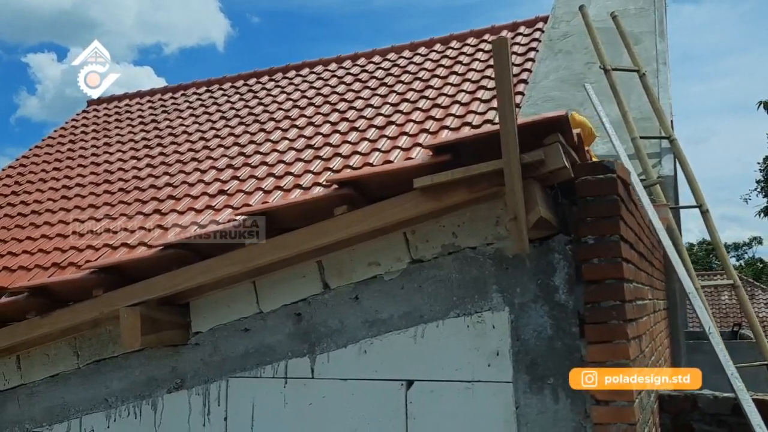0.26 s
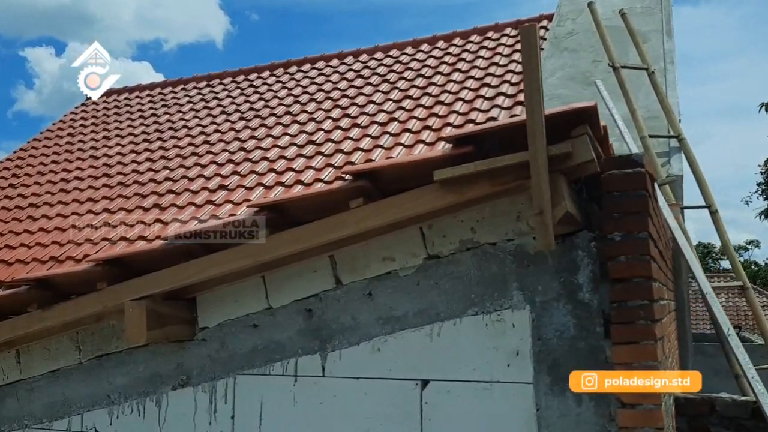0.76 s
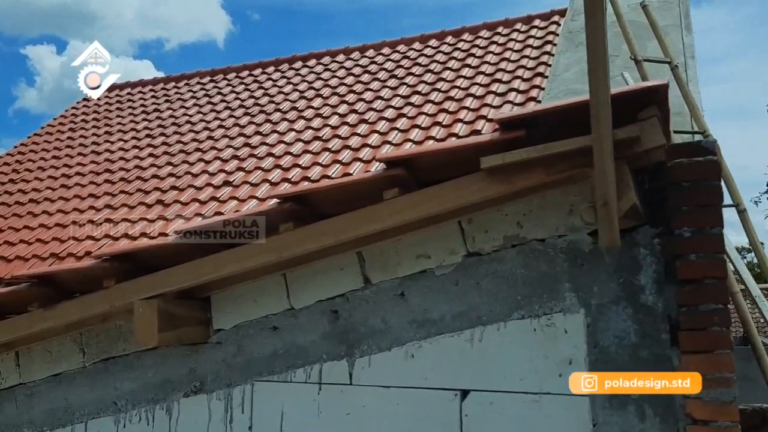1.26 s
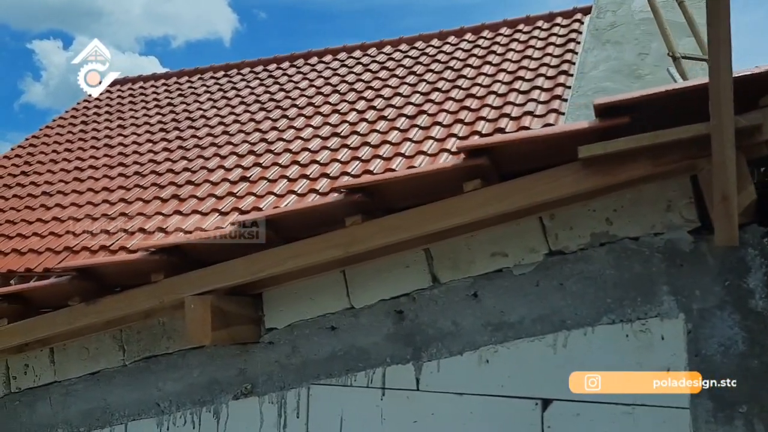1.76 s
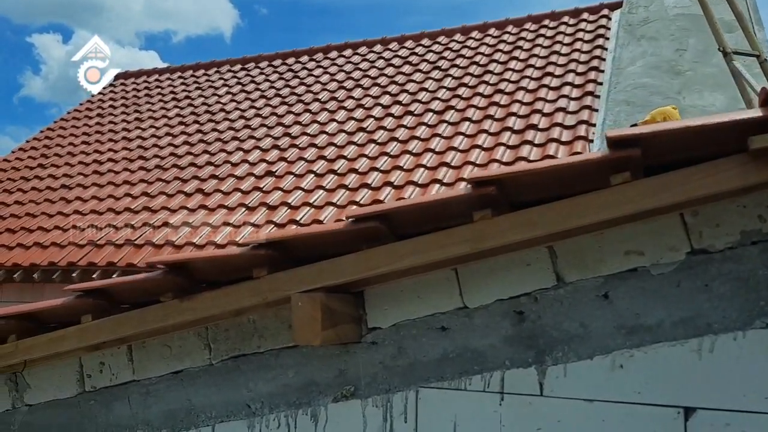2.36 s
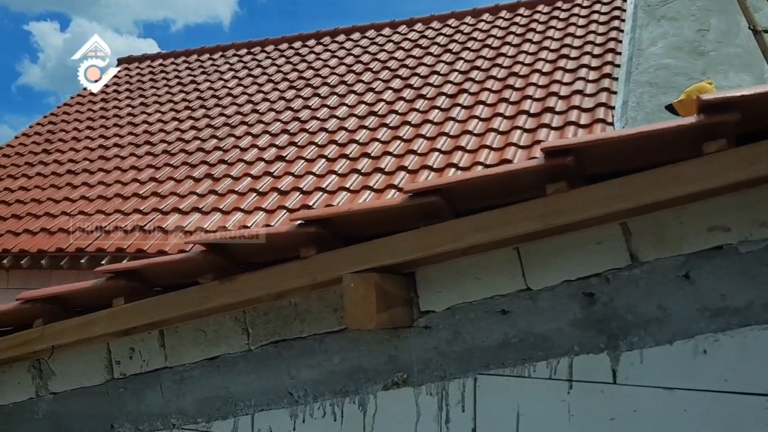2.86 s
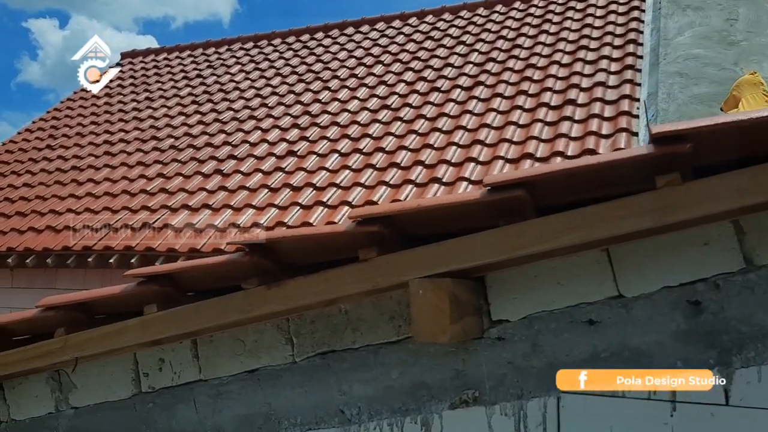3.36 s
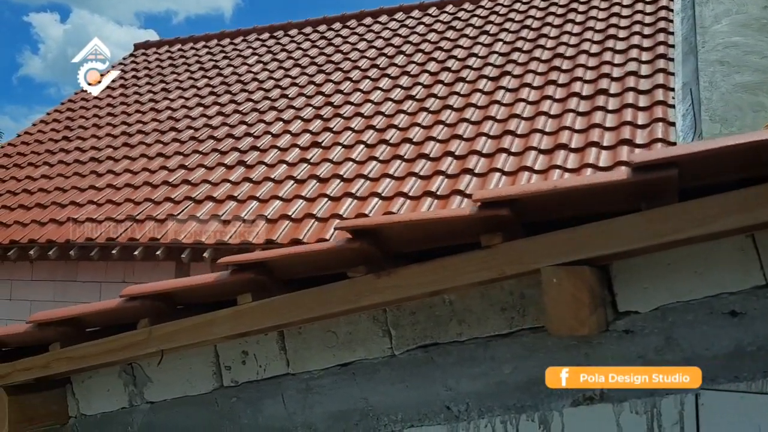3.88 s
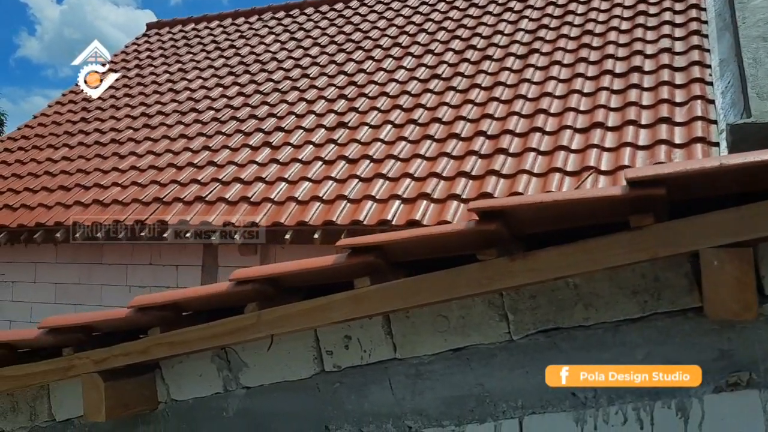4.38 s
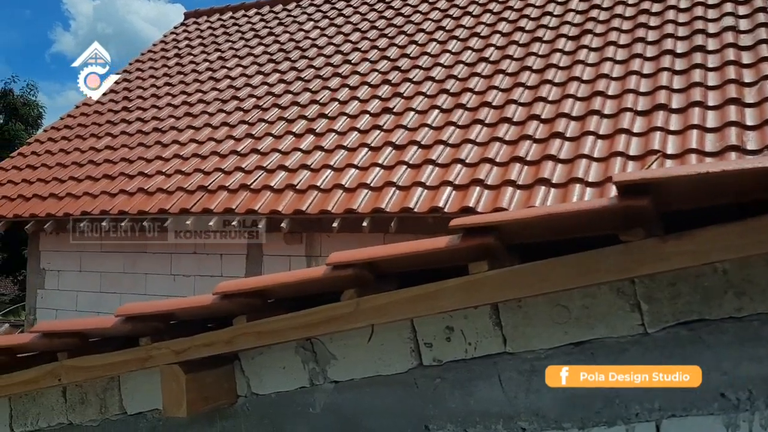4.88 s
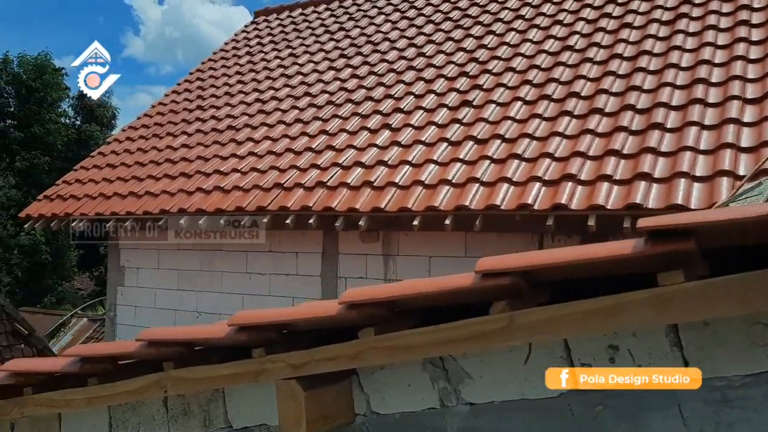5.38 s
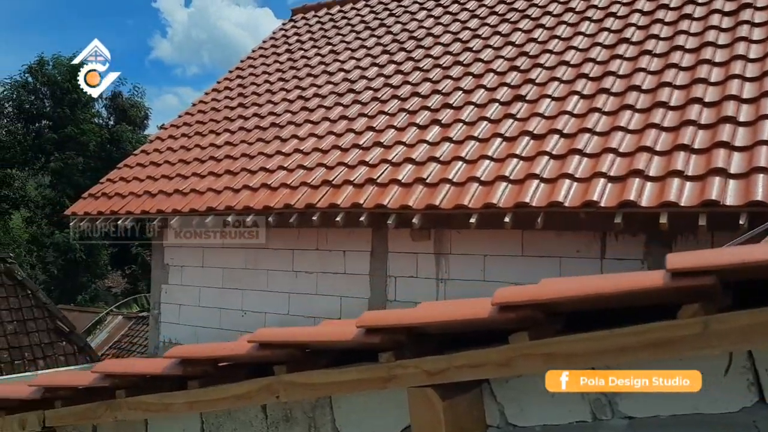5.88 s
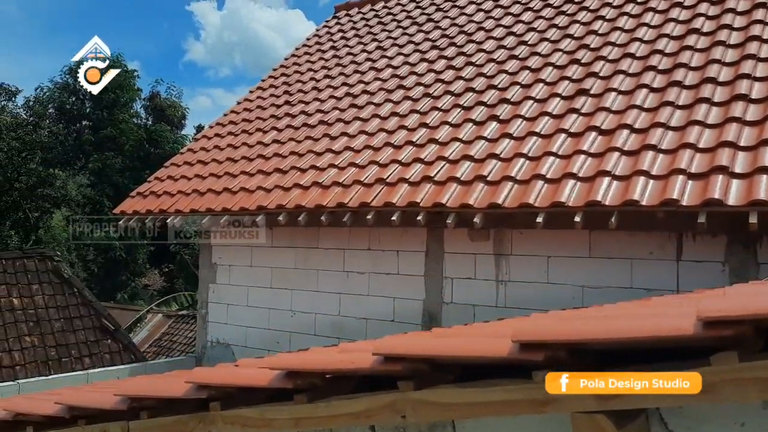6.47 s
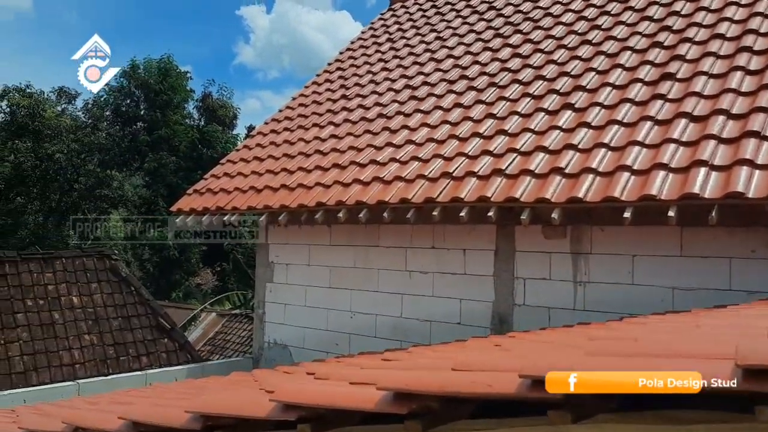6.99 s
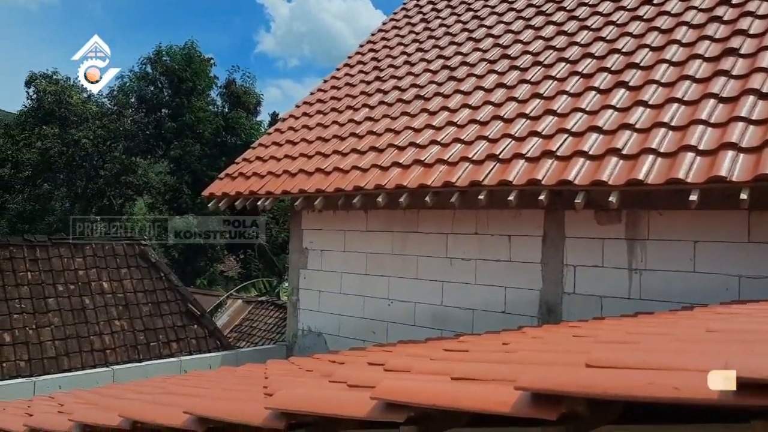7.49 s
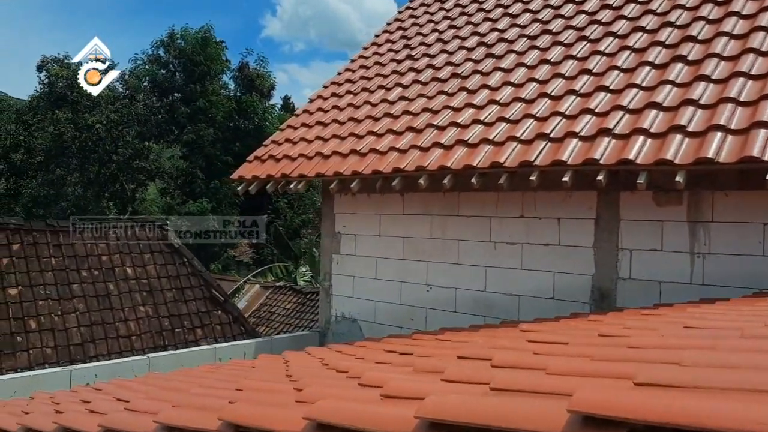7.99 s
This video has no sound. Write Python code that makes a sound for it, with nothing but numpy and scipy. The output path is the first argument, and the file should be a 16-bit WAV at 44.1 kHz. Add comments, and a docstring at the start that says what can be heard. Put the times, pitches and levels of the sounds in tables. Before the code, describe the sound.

A steel hammer drives a chisel into stone in even, ringing blows that boom through bare rooms, over a quiet outdoor hush.

```python
"""Over a quiet outdoor hush, dull knocks sound from deep inside an unfinished brick house. A steel hammer
taps a chisel once, then drives it in eleven even blows: each a sharp crack, a brief steel ring, then the
boom of the bare rooms. From 1 s a far whine climbs; it and the knocks are gone by about 3 s. Grit ticks
and something scuffs between blows, and a thin, very high squeak flickers near 3.7 s and 6 s. One last far
knock closes the scene. Heard through two microphone ports, the left one nearer the hammer."""
import sys
import numpy as np
from scipy import signal
from scipy.fft import rfft, irfft, next_fast_len
from scipy.io import wavfile
from scipy.ndimage import map_coordinates

SR = 44100
rng = np.random.default_rng(int(sys.argv[2]) if len(sys.argv) > 2 else 0)


def store_pcm(level_fs):
    """Save levels as 16-bit WAV."""
    pcm = np.round(np.clip(level_fs, -1, 1) * 32767).astype(np.int16)
    wavfile.write(sys.argv[1], SR, np.atleast_2d(pcm).T)


N = 363384

# One row a blow: t/s, wash EQ at 12 kHz/dB, wash EQ at 1.5 kHz/dB, ring length/factor,
# left minus right/dB, standing waves/dB, 3 x wall knock/dB, clack Q, boom/dB, wash/dB, clack/dB,
# clack f/Hz, spit/dB, spit f/Hz, boom EQ from 900 Hz up/dB, 6 x ring group/dB
BLOWS = [(0.242, -3, -2, 0.73, 0, -45, -58, -48, -52, 6.6, -49, -57, -48, 2220, -46, 7500, -25.5, -66, -49, -58.5, -67, -65, -68),
         (0.77, 3, -4.5, 0.97, 0.94, -48.5, -27.5, -38, -49, 6, -32, -40.5, -21, 2440, -20.5, 8330, -4, -32, -36, -36, -28.5, -40, -58),
         (1.462, 2, 1, .9, 1, -43.5, -31, -44, -61, 8.8, -35, -36.5, -20.5, 2350, -27, 11000, -1, -39, -50, -36, -46, -43.5, -50),
         (2.117, -0.5, 0.5, 0.75, 0.02, -43.5, -29, -40, -56, 2.9, -28.5, -35, -14.5, 2700, -26.5, 11000, 0, -46, -39.5, -34, -45, -40, -44),
         (2.783, -2.5, 1, 0.88, 0.7, -38.5, -20, -27, -37, 2.8, -30, -35.5, -19, 2950, -15, 14200, 3.5, -52, -59, -41, -68, -49, -56),
         (3.42, 2, 4.5, 0.58, -1, -38, -27, -31.5, -45.5, 6, -34, -33.5, -18.5, 2200, -22, 11530, -31.5, -37.5, -70, -29.5, -50, -34, -49),
         (4.065, -2, 0, 0.52, 0.064, -34.5, -23, -23, -24, 7.6, -31, -34.5, -19, 1740, -12, 7090, 8.5, -68, -42, -39, -46, -79, -53),
         (4.673, 2.5, -2, 0.67, 0.93, -35.5, -24, -29.5, -31, 6, -30, -40, -28.5, 1845, -12.5, 13700, 7.5, -32, -39, -32.5, -33, -39, -54),
         (5.305, 2, 5, 1.1, -0.12, -34, -31, -31.5, -33, 9.8, -33, -35.5, -29, 2680, -13.5, 8780, -9.5, -49, -36.5, -51, -62, -45, -68),
         (5.914, 1.5, -3, 1.44, -0.66, -34.5, -25.5, -30.5, -50, 6, -31, -39, -28, 2570, -9, 8470, -0.5, -33.5, -46, -42, -32, -42, -62),
         (6.52, 0.5, -0.5, 0.89, -0.24, -34.5, -30, -56, -38, 8.1, -32, -36, -30.5, 2620, -13.5, 8500, -4, -44.5, -35.5, -60, -29.5, -42, -67),
         (7.113, 2.5, -1.5, 1.05, -0.057, -34.5, -23.5, -45, -39, 6, -31, -36, -25, 2730, -14, 8420, -2.5, -43.5, -42, -46.5, -40, -45, -61.5)]
# The hammer touches the chisel again, lightly: t/s, level/dB, f/Hz
REBOUNDS = [(.808, -40, 6350), (1.5, -26.5, 6540), (2.154, -35.5, 6400), (2.819, -37, 6630),
            (3.452, -47, 6400), (4.096, -32.5, 6270), (4.707, -43, 7250), (5.336, -38, 4500),
            (7.148, -34, 13600)]
def hammer():
    """Steel drives the chisel into stone: crack and ring up front, body and room tail behind."""
    out, pan_db = np.zeros((2, N)), np.zeros(N)
    for blow in BLOWS:
        s, top_db, mid_db, ring_length, left_db, deep_db = blow[:6]
        knock_db, ring_db = blow[6:9], blow[17:]
        clack_q, boom_db, wash_db, clack_db, clack_hz, spit_db, spit_hz, edge_db = blow[9:17]
        clack = lambda f: abs(resonance(f, clack_hz, clack_q)) ** 2
        spit = lambda f: abs(resonance(f, spit_hz, 38)) ** 2
        add(out, s, crack(clack, clack_db, spit, spit_db))
        ring = steel_ring(ring_db, ring_length)
        add(out, s, spread(ring, 0.408, 0.49))
        add(out, s, amp(-9.5) * ring_reflections(ring))
        add(out, s, standing_waves(deep_db))
        add(out, s, wall_knocks(knock_db) + amp(boom_db - 13) * thump())
        add(out, s, amp(boom_db) * room_boom(edge_db))
        add(out, s, amp(wash_db) * room_wash(mid_db, top_db, clack, spit))
        pan_db[round(s * SR):] = left_db  # held until the next blow
    for s, db, hz in REBOUNDS:
        add(out, s, amp(db) * burst(lambda f: resonance(f, hz, 8.3) ** 2, t60=.016))
    return out * amp(pan_db * [[.5], [-.5]])


# Clack of the stone under the chisel: f/Hz, level/dB
CLACK_EQ = [(200, -24), (400, -1), (900, -3.5), (1500, -12), (4000, -15), (7000, -16), (10000, -26)]
# Bright spit of steel on steel: f/Hz, level/dB
SPIT_EQ = [(2000, -26), (5000, -33), (7500, 0), (11000, -9), (14000, -6), (16500, -13.5)]
def crack(clack, clack_db, spit, spit_db):
    """The attack: stone clacks and steel spits, two noise bursts with a resonant peak each."""
    stone = burst(lambda f: amp(curve(CLACK_EQ, f)) + amp(-6.5) * clack(f), t60=0.034)
    steel = burst(lambda f: amp(curve(SPIT_EQ, f)) + amp(11.5) * spit(f), t60=0.011)
    return amp(clack_db) * stone + amp(spit_db) * steel


# Modes of hammer and chisel: f/Hz, level/dB, base t60/s, ring group
STEEL_MODES = [(4393, 5, .11, 0), (4548, 2, .11, 4), (4470, -6, .06, 0), (4650, -8, .07, 4),
               (5830, 3, .34, 1), (7208, 2, .07, 2), (7252, 1, .18, 2), (8620, -4, .06, 3),
               (8760, -7, .05, 3), (8240, -7, .05, 3), (9150, -7, .05, 3), (10600, 0, .1, 5)]
GROUP_RISE_S, GROUP_LENGTH = (.0002, .0018, .0002, .0002, .00025, .0003), (1.3, 1.1, 1, .73, 1.7, 1.2)
def steel_ring(group_db, length):
    """The steel's modes waver in phase as hand and stone damp the chisel unevenly."""
    t = np.arange(SR * 2 // 5) / SR
    ring = 0
    for hz, db, t60, group in STEEL_MODES:
        level_db = group_db[group] + db + rng.normal(0, 0.89)
        decay = amp(level_db - 60 * t / (t60 * length * GROUP_LENGTH[group]))
        waver = np.cumsum(rng.standard_normal(len(t))) * .0065 + rng.random()
        ring += decay * np.sin(2 * np.pi * (hz * t + waver)) * attack(t, GROUP_RISE_S[group])
    clink = amp(0.5 - 60 * t / 0.022)  # a louder start, until the stone damps it
    return ring * (1 + clink)


def ring_reflections(ring):
    """The walls return a smeared copy of the ring."""
    walls = reverb(lambda f: f > 3000, rise_s=0.0027, stretch=0.85, lead_ms=0, size=SR // 3)
    return signal.fftconvolve(ring[None], walls / np.linalg.norm(walls[0]), axes=1)


# The push and its slapbacks from big walls: t/s, level/dB
SLAPS = [(.001, 2), (0.022, 4.5), (.04, -2.5), (.058, -3), (0.089, -15)]
# Low-mid resonances of the blow's thump and the room: f/Hz, width/Hz, level/dB
THUMP_RESONANCES = [(202, 110, 1), (287, 30, -8.5), (354, 28, -13), (462, 40, -12), (568, 35, -19.5),
                    (695, 27, -12.5), (880, 60, -21)]
def thump():
    """The body of the hit: a push and its wall returns excite low-mid resonances."""
    push = np.zeros((2, SR // 4))
    for delay, db in SLAPS:
        push[0, round(delay * SR)] = -amp(db + rng.normal(0, 0.95))
    body = lambda f: sum((-1) ** k * amp(db) * resonance(f, hz, hz / width) * np.sqrt(hz / width)
                         for k, (hz, width, db) in enumerate(THUMP_RESONANCES))
    return unit_onset(stereo(filtered(push, body), 0.72, [(1, 1)]))


# Boom of the bare rooms: f/Hz, level/dB
BOOM_EQ = [(18, -60), (33, -33), (60, -8.5), (173, -7.5), (204, -6), (232, -8), (302, 2), (386, -7.5),
           (493, -6), (640, -12.5), (742, -8), (1140, -25), (1500, -29.5), (1950, -57.5), (3300, -120)]
def room_boom(edge_db):
    """The rooms answer a blow with a dark tail; edge_db sets its bite in the mids."""
    colour = lambda f: amp(curve(BOOM_EQ, f) + curve([(350, 0.021), (900, edge_db)], f))
    return reverb(colour, rise_s=0.011, stretch=1, lead_ms=0.3, size=2 * SR // 3)


# Bright reverb of the crack: f/Hz, level/dB
WASH_EQ = [(530, -6), (900, -8), (1410, -15.5), (2190, -17.5), (2970, -21), (5130, -24.5), (5650, -19.5),
           (9780, -19.5), (13700, -11), (15900, -17.5), (16500, -50)]
# Treble tilt on that reverb: f/Hz, level/dB
WASH_TILT = [(3000, 2), (6500, -1.5), (13000, -12.5)]
def room_wash(mid_db, top_db, clack, spit):
    """Near walls, the facing wall and the farther rooms return the colours of this blow's crack."""
    short = SR // 3
    bands_db = 2.7 * rng.standard_normal(size=48)  # many short steel modes leave uneven bands
    blow_eq = [(1500, mid_db), (4500, 0.0029), (7000, 0), (12000, top_db)]
    def colour(f):
        db = curve(WASH_EQ, f) + curve(WASH_TILT, f) + curve(blow_eq, f)
        return amp(db + map_coordinates(bands_db, [f / 480])) * (1 + 0.84 * clack(f) + .9 * spit(f))
    dulled = lambda f: colour(f) / (1 + (f / 9000) ** 2)
    gate = .5 - .5 * np.tanh((np.arange(short) / SR - 0.066) / 0.0093)  # closes after 66 ms
    near = reverb(colour, rise_s=.004, stretch=0.79, lead_ms=.3, size=short)
    facing = amp(-5) * reverb(colour, rise_s=0.0052, stretch=0.66, lead_ms=0.27, size=short) * gate
    wash = amp(-13) * reverb(dulled, rise_s=0.0048, stretch=2.5, lead_ms=0.11, size=2 * short)
    add(wash, 0, near)
    add(wash, .018, facing)
    return wash


# Low modes of the rooms: f/Hz, t60/s, level/dB
ROOM_MODES = [(47.6, .4, -10.5), (55.7, 0.5, -0.5), (72, 0.45, 6), (108.7, 0.57, 3), (135, 0.43, 0.5),
              (182, 0.12, 2)]
def standing_waves(db):
    """The low end: room modes swell and beat against each other in throbs."""
    t = np.arange(SR * 2 // 3) / SR
    in_phase_s = .059
    waves = -sum(amp(db + level - 60 * t / t60) * np.cos(2 * np.pi * hz * (t - in_phase_s))
                 for hz, t60, level in ROOM_MODES)
    return spread(3 * waves * attack(t, 0.064) ** 2, .37, 0.85)


WALL_DELAY_S, WALL_HZ, WALL_Q = (.0235, .0405, .06), (339, 316, 300.5), (1.1, 2.2, 1)
def wall_knocks(levels_db):
    """Three walls each send back one rounded, hollow pulse a few cycles long."""
    t = np.arange(SR // 4) / SR
    pulses = sum(amp(db) * 2 * np.cos(2 * np.pi * hz * (t - s)) * np.exp(-2 * ((t - s) * hz / q) ** 2)
                 for db, s, hz, q in zip(levels_db, WALL_DELAY_S, WALL_HZ, WALL_Q))
    return spread(pulses, .4, 1)


# Knocks from farther inside: t/s, boom/dB, clatter/dB, rise/s
FAR_KNOCKS = [(0, -59, -64.5, 0.09), (.24, -41, -55, 0.0025), (0.714, -44.5, -62, 0.012),
              (1.274, -44, -60.5, 0.016), (1.79, -43.5, -59, 0.012), (2.045, -52, -59, 0.0036),
              (2.553, -42.5, -66.5, 0.013), (8.17, -55.5, -67.5, 0.07)]
# Their muffled boom: f/Hz, level/dB
FAR_BOOM_EQ = [(18, -33), (30, -36), (81, -5), (146, 2), (202, 1.5), (247, 1), (394, -3), (596, -21),
               (900, -21.5), (1170, -49), (1980, -120)]
# Their midrange clatter: f/Hz, level/dB
CLATTER_EQ = [(350, -54), (600, 3), (661, -3.5), (919, -5.5), (1100, -5.5), (1350, -9.5), (1700, -18),
              (2210, -8), (2720, -16.5), (5330, -24), (7620, -30), (14300, -56), (16000, -66)]
def far_knocks():
    """From rooms away only reverb arrives, slow to rise and die, with a faint treble puff in front."""
    out = np.zeros((2, N))
    for s, boom_db, clatter_db, rise_s in FAR_KNOCKS:
        boom = reverb(lambda f: amp(curve(FAR_BOOM_EQ, f)), rise_s, stretch=1.76, lead_ms=0.31)
        clatter = reverb(lambda f: amp(curve(CLATTER_EQ, f)), rise_s / 2, stretch=2.8, lead_ms=0.055)
        puff = burst(lambda f: resonance(f, 8000, 0.55) ** 2, t60=0.22)
        add(out, s, amp(boom_db) * boom + amp(clatter_db) * clatter)
        add(out, s, amp(clatter_db - 11) * puff)
    return out


# Grit and small bumps: t/s, level/dB, f/Hz, Q
TICKS = [(1.311, -52, 696, 1.7), (2.047, -42.5, 716, 7.3), (2.93, -46, 1290, 2.6), (3.086, -41, 323, 5.7),
         (3.665, -50, 1010, 0.56), (3.725, -41, 430, 2.4), (3.875, -31, 69.5, 2.1), (3.931, -41, 80, 1.7),
         (3.957, -51.5, 4500, 0.17), (3.958, -51, 7850, 6.1), (3.999, -53, 1520, 0.41),
         (4.492, -55, 1150, 4.8), (4.55, -52.5, 1480, 1.7), (4.946, -59, 3800, 2.8),
         (5.239, -44.5, 146, 4.7), (5.738, -63, 4800, 3), (6.217, -55, 1500, 0.86),
         (7.623, -41, 1000, 0.96), (7.623, -53.5, 319, 2.1), (8.084, -53, 120, 2.6), (8.211, -37, 106, 2)]
def grit_ticks():
    """Grit ticks in short pings of noise; the higher ones die sooner."""
    out, t = np.zeros((2, N)), np.arange(SR // 4) / SR
    for s, db, hz, q in TICKS:
        t60 = 0.069 * (1000 / hz) ** 0.73
        add(out, s, noise_band(hz, q, len(t)) * attack(t, 3 / hz) * amp(db - 60 * t / t60))
    return out


# Brief scrapes: t/s, length/s, level/dB, f/Hz, Q
SCUFFS = [(0.334, 0.091, -56, 1217, 6.4), (3.116, 0.068, -68, 6250, 1), (3.85, 0.034, -65.5, 2600, 1),
          (3.668, 0.14, -56, 714, 0.56), (5.858, 0.083, -69, 9000, 0.72), (6.164, 0.056, -61.5, 5600, 0.65),
          (6.168, 0.087, -67, 4200, 4), (6.2, 0.062, -64, 2500, 2.4), (7.576, 0.063, -54, 2050, 2.4),
          (7.57, 0.082, -60, 4500, 0.7), (7.905, 0.07, -69.5, 2710, 0.5), (8.206, 0.1, -61.5, 2480, 0.95)]
def scuffs():
    """Something scuffs: bands of noise that swell and fade unevenly."""
    out, t = np.zeros((2, N)), np.arange(SR // 4) / SR
    for s, length, db, hz, q in SCUFFS:
        add(out, s, noise_band(hz, q, len(t)) * swell(t, length) * amp(db + 1.2 * wobble(t, 150, 48)))
    return out


# Flickers of the squeak: t/s, length/s, level/dB
SQUEAKS = [(3.63, 0.25, -72.5), (5.574, 0.02, -69), (5.594, 0.12, -66), (5.74, 0.03, -73),
           (6.108, 0.15, -67), (6.26, 0.12, -69)]
SQUEAK_HZ = 12850
def squeak():
    """A thin, breathy tone that wavers and stutters, off to the right."""
    out, t = np.zeros((2, N)), np.arange(SR // 4) / SR
    for s, length, db in SQUEAKS:
        stutter_db = 3 * wobble(t, 60, 24)
        hz = SQUEAK_HZ + 130 * wobble(t, 50, 24)
        tone = .5 * np.sin(2 * np.pi * np.cumsum(hz) / SR) + .6 * noise_band(SQUEAK_HZ, 45, len(t))
        add(out, s, tone * swell(t, length) * amp(db + stutter_db) * [[.6], [1.5]])
    return out


# Glide of the far whine: t/s, f/Hz, level/dB
WHINE = [(1.1, 1220, -90), (1.25, 1242, -70), (1.7, 1297, -64), (2.05, 1396, -63), (2.3, 1400, -93)]
def far_whine():
    """A narrow, rough band of noise climbs slowly, like a distant tool gathering speed."""
    s, hz, db = np.transpose(WHINE)
    t = np.arange(N) / SR
    rough = unit(noise(lambda f: 1 / (1 + (f / 95) ** 2), N))
    tone = rough * np.sin(2 * np.pi * np.cumsum(np.interp(t, s, hz)) / SR)
    return stereo(tone, .1, [(1, 0.55)]) * amp(np.interp(t, s, db, left=-120, right=-120))


# Low bed of the hush: f/Hz, level/dB
RUMBLE_EQ = [(15, -66.5), (25, -17.5), (37, -8), (59, 0.5), (82, -10.5), (230, -31), (306, -15),
             (609, -37.5), (900, -34), (1170, -55.5), (1980, -120)]
# Airy top of the hush: f/Hz, level/dB
HISS_EQ = [(290, -44), (500, -2.5), (1540, 0), (1750, -3), (2300, -3), (2900, -10), (3550, -12.5),
           (4230, -10.5), (4880, -11), (5800, -11.5), (6510, -10), (7420, -17), (9480, -14), (14400, -15),
           (15900, -20)]
# Fader ride on the hiss: t/s, level/dB
HISS_RIDE = [(0, -60), (.5, -67.5), (1.3, -75.5), (1.6, -70.5), (3.2, -72), (4.2, -66.5), (5.4, -69),
             (6.1, -67), (7.4, -67.5), (7.9, -71.5), (8.24, -73)]
REST_DB, STIR_DB, STIR_FALL_DB_PER_S = -72, -14, 31  # rumble at rest; stirred, relative to a blow's boom
def hush():
    """A lumpy rumble that every blow stirs up and a slowly drifting hiss, slightly from the right."""
    t = np.arange(N) / SR
    stirred = 0
    for blow in BLOWS:
        age, boom_db = (t - blow[0]).clip(0), blow[10]
        stirred += amp(boom_db + STIR_DB - STIR_FALL_DB_PER_S * age) * attack(age, 0.066)
    lumps = amp(3 * wobble(t, 11, 128))
    rumble = stereo(noise(lambda f: amp(curve(RUMBLE_EQ, f)), N), -0.042, [(60, 0.77), (600, 0.62)])
    hiss = stereo(noise(lambda f: amp(curve(HISS_EQ, f)), N), -0.41, [(1000, 0.52), (10000, 0.079)])
    ride = amp(np.interp(t, *np.transpose(HISS_RIDE)))
    return (amp(REST_DB) + stirred) * lumps * unit(rumble) + ride * unit(hiss)


# Decay of the brick rooms: f/Hz, base t60/s
ROOM_DECAY = [(50, 0.76), (130, 0.77), (350, 0.59), (920, 0.31), (2400, 0.38), (6400, 0.38), (15000, 0.31)]
# Stereo image of the reverb: f/Hz, left-right likeness/0-1
ROOM_LIKENESS = [(60, 0.91), (300, 1), (800, 0.86), (2000, 0.49), (8000, 0.2)]
def reverb(colour, rise_s, stretch, lead_ms, size=SR):
    """Echoes build up, then each frequency dies in the rooms' decay time multiplied by stretch."""
    hz, t, spectrum = signal.stft(rng.standard_normal((2, size)), SR, nperseg=256)
    decay = amp(-60 * t / (stretch * curve(ROOM_DECAY, hz))[:, None])
    tail = signal.istft(spectrum * decay, SR, nperseg=256)[1][:, :size]
    tail = stereo(filtered(tail, colour), lead_ms, ROOM_LIKENESS)
    return unit_onset(tail * attack(np.arange(size) / SR, rise_s) ** 2)


def burst(colour, t60):
    """A snap of noise that dies in t60 seconds, narrow in the mids and wide on top."""
    t = np.arange(SR // 8) / SR
    snap = stereo(noise(colour, len(t)), 0.405, [(1000, 0.96), (10000, 0.12)])
    return unit(snap) * attack(t, 0.00069) ** 2 * amp(-60 * t / t60)


def noise_band(hz, q, size):
    """Band-passed noise with a wide image, rms 1."""
    band = noise(lambda f: resonance(f, hz, q) ** 2, size)
    return unit(stereo(band, 0.09, [(300, 0.34), (3000, 0.28), (12000, 0.11)]))


def stereo(pair, lead_ms, likeness):
    """Mixes a mid and a side signal by (f/Hz, likeness) points; the left port leads by lead_ms."""
    angle = lambda f: np.arccos(np.clip(curve(likeness, f), 0, 1)) / 2
    mid, side = filtered(pair, lambda f: np.array([np.cos(angle(f)), np.sin(angle(f))]))
    lead = lambda f: np.exp(1j * np.pi * f * lead_ms / 1000 * np.array([[1], [-1]]))
    return filtered(np.array([mid + side, mid - side]), lead)


def spread(mono, lead_ms, trim):
    """Sends one signal to both ports, left first; trim below 1 turns it down slightly."""
    return stereo(np.array([mono, 0 * mono]), lead_ms, [(1, trim)])


def filtered(x, response):
    """x through a complex frequency response."""
    size = next_fast_len(x.shape[-1] + 4096)
    return irfft(rfft(x, size) * response(np.fft.rfftfreq(size, 1 / SR)), size)[..., :x.shape[-1]]


def noise(colour, size):
    return filtered(rng.standard_normal((2, size)), colour)


def resonance(f, hz, q):
    """A band-pass with gain 1 at its centre."""
    return 1j * f * hz / q / (hz * hz - f * f + 1j * f * hz / q)


def curve(points, hz):
    """Joins (f/Hz, value) points on a log axis."""
    f, value = np.transpose(points)
    return np.interp(np.log(hz + 1), np.log(f + 1), value)


def wobble(t, rate_hz, points):
    """A smooth random modulator."""
    return map_coordinates(rng.standard_normal(size=points), [t * rate_hz])


def attack(t, rise_s):
    return 1 - np.exp(-t / rise_s)


def swell(t, length):
    return np.sin(np.pi * np.clip(t / length, 0, 1) ** 0.7)


def amp(db):
    return 10 ** (np.asarray(db) / 20)


def unit(x):
    return x / np.sqrt(np.mean(x ** 2) + 1e-20)


def unit_onset(x):
    """Scales to rms 1 over the first 0.1 s."""
    return x / np.sqrt(np.mean(x[:, :SR // 10] ** 2))


def add(out, s, x):
    """Lays x into a track at s seconds."""
    i = round(s * SR)
    out[:, i:i + x.shape[1]] += x[:, :N - i]


def scene():
    """The mix, from foreground to bed."""
    return hammer() + far_knocks() + grit_ticks() + scuffs() + squeak() + far_whine() + hush()


# Colour difference of the microphone ports: f/Hz, left minus right/dB
PORT_EQ = [(60, 0), (200, 1), (700, 3.5), (1300, 3.5), (2400, 0), (5000, 1.5), (8500, -1.5), (11500, 2.5),
           (15000, -2.5)]
LOW_CUT_HZ, HIGH_CUT_HZ = 33.8, 16100
def record(dry):
    """The ports differ a little in colour and lose the deepest bass and the highest treble."""
    colour = lambda f: amp(curve(PORT_EQ, f) * [[.5], [-.5]])
    low_cut = lambda f: (1j * f / (LOW_CUT_HZ + 1j * f)) ** 4
    return filtered(dry, lambda f: colour(f) * low_cut(f) / (1 + (f / HIGH_CUT_HZ) ** 120))


dry = scene()
out = record(dry)
store_pcm(out)
```